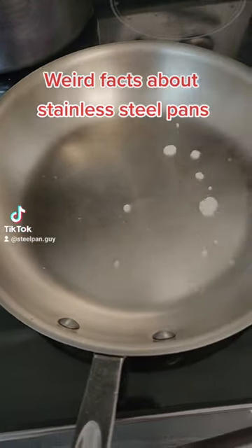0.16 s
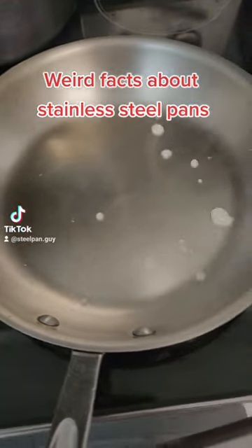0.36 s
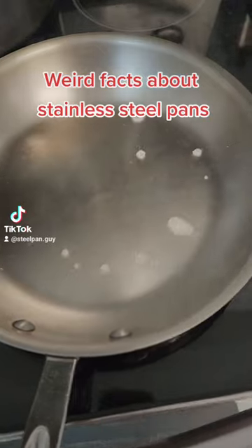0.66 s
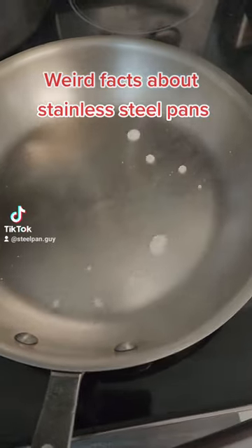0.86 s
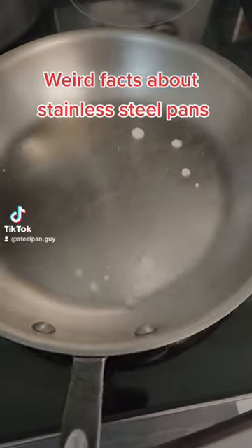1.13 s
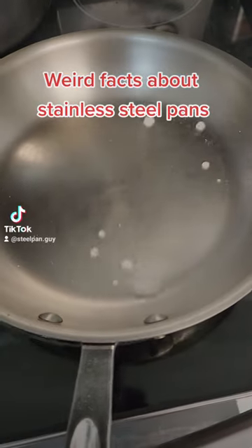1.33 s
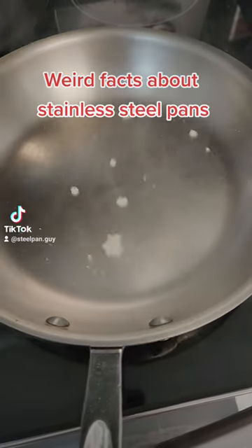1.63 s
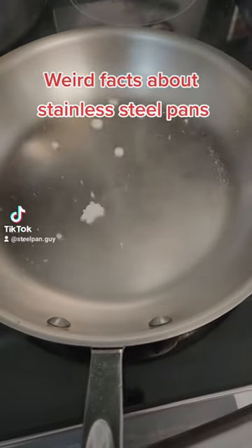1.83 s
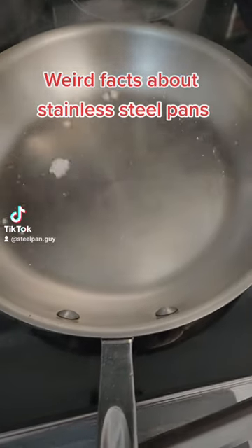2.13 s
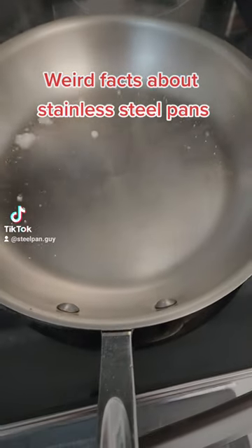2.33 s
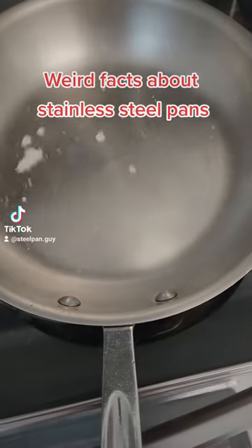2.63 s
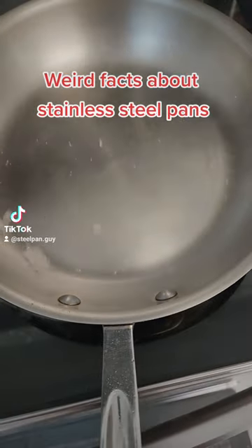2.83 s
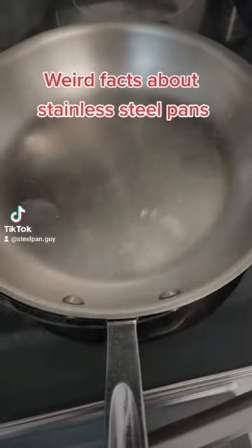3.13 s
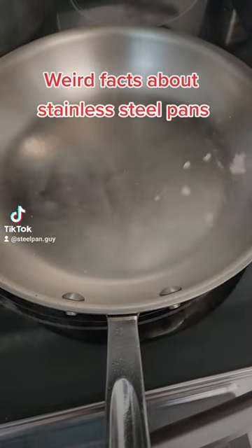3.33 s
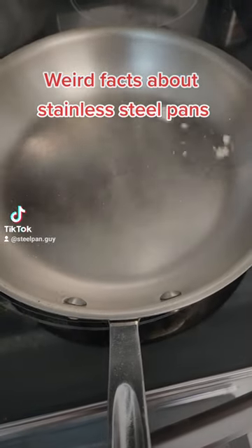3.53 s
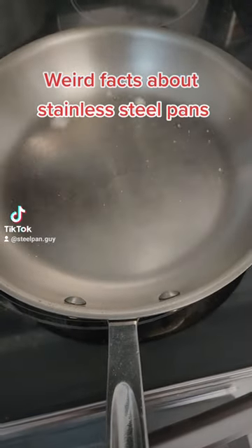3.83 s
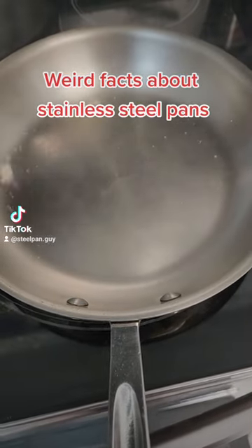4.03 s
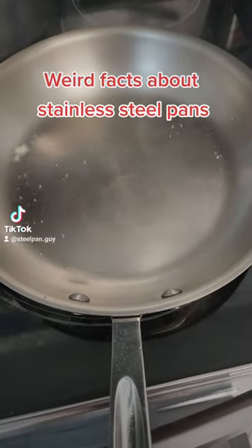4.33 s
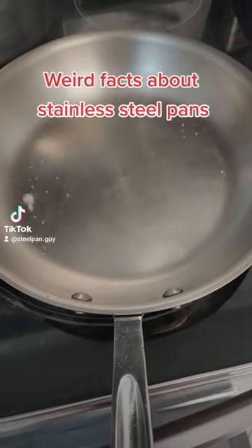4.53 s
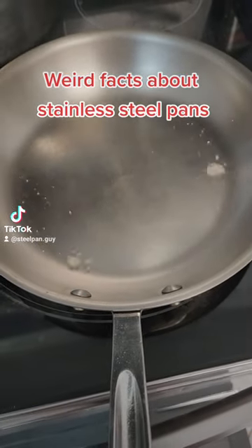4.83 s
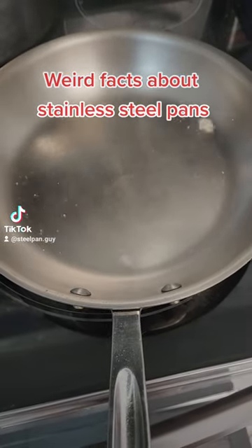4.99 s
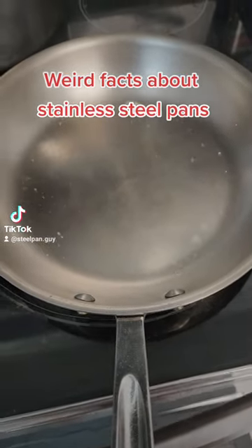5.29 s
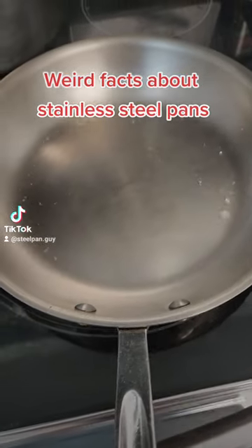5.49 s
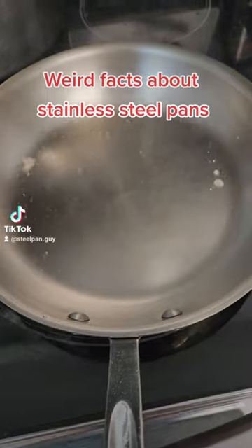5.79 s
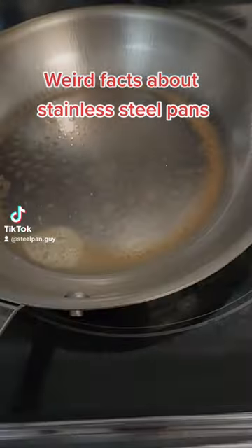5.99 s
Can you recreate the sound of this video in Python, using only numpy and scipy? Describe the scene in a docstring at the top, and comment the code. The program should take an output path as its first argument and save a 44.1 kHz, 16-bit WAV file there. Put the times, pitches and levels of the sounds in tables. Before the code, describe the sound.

A close stereo capture in a small kitchen with a faint low room rumble. From 0 s, water drops sizzle in a hot steel pan: bright continuous hiss, dense fine crackle, little ticks and a coarser sputter underneath, coloured by thin metallic resonances. At about 0.3 s the pan lands hard on the hob, a loud, quick double clack with short echo and low boom. Very soft bumps follow near 1.0 and 1.95 s while the sizzle gently swells and ebbs. Around 2.75-3.05 s it flares strongly, with sharp spits and low boiling flutter; a muffled, weighty thud lands at 3.08 s. Another faint bump comes near 3.7 s. The sizzle gradually dries, thinner and quieter, with smaller flares near 4.35, 4.7, 5.05 and 5.5 s and isolated pops. At 5.95 s everything cuts out briefly; at 6.02 s a dull knock and short clatter end it, without sizzle.

```python
"""A small kitchen, a phone close to a hot steel pan that is swirled while water drops skate and boil on it.
The sizzle is shaped stereo noise: steam, random bursts, ticks and pan resonances. It flares as water
spreads out, once strongly, and slowly dries. The pan knocks on the hob, hard at first, then in a few
soft bumps, as damped sines and cracks with an echo; after the heavy landings the room booms.
Near the end the sound cuts out briefly; the room returns with one more knock and a short clatter."""
import sys
import numpy as np
from scipy import signal
from scipy.fft import rfft, irfft, next_fast_len
from scipy.io import wavfile
from scipy.ndimage import uniform_filter1d, minimum_filter1d, map_coordinates

SR = 44100
rng = np.random.default_rng(int(sys.argv[2]) if len(sys.argv) > 2 else 0)


def generate_wav(sig):
    """Save sig (samples, or channels by samples) to the path in sys.argv[1] as 16-bit PCM at SR."""
    pcm = np.round(np.clip(np.atleast_2d(sig).T, -1, 1) * 32767).astype(np.int16)
    wavfile.write(sys.argv[1], SR, pcm)


N = 271215

TOP_HZ = 15800  # band limit of the phone
FIZZ_DB = -24.5  # level of the fine fizz before drying and flares


def amp(db):
    """Decibels to gain."""
    return 10 ** (np.asarray(db) / 20)


def unit(x):
    """x at rms 1."""
    return x / np.sqrt(np.mean(x ** 2) + 1e-20)


def along(points, hz):
    """The (Hz, value) points read on a log frequency axis."""
    f, v = np.transpose(points)
    return np.interp(np.log(hz + 1), np.log(f + 1), v)


def wobble(rate):
    """A smooth random curve with rate knots a second."""
    knots = rng.standard_normal(int(N * rate / SR) + 4)
    return map_coordinates(knots, [np.arange(N) * rate / SR])


def filtered(x, response):
    """x with its spectrum multiplied by a response of frequency."""
    n = x.shape[-1]
    m = next_fast_len(n + SR // 4)
    return irfft(rfft(x, m) * response(np.fft.rfftfreq(m, 1 / SR)), m)[..., :n]


def add(track, s, sound):
    """Mix a sound into a track from time s on."""
    part = track[..., round(s * SR):][..., :sound.shape[-1]]
    part += sound[..., :part.shape[-1]]


def port_noise(n):
    """White noise at two microphone ports: alike in the bass, unrelated in the treble."""
    # likeness of the two ports: frequency_hz, correlation (0-1)
    likeness = [(200, 0.99), (450, 0.83), (1000, 0), (2600, 0.34), (4000, 0), (7000, 0)]

    def mid_and_side(hz):
        turn = np.arccos(np.clip(along(likeness, hz), 0, 1)) / 2
        return np.array([np.cos(turn), np.sin(turn)])

    mid, side = filtered(rng.standard_normal((2, n)), mid_and_side)
    return np.array([mid + side, mid - side])


def to_ports(hz, lead_s=0.0001683):
    """Sound from the pan reaches the left port a little before the right."""
    return np.exp(2j * np.pi * hz * lead_s * np.array([[.5], [-.5]]))


def room_tone():
    """A faint steady rumble in the kitchen with a low hum in it."""
    # low murmur of the room, shape only: frequency_hz, density_db (per Hz)
    murmur = [(20, 2.5), (48, -0.5), (62, -5.5), (78, 2), (98, -7.5), (122, -2.5), (170, -9), (350, -5),
              (900, -32.5), (3000, -63)]
    rumble_db, hum_db, hum_hz = -52, -63, 53.4
    rumble = unit(filtered(port_noise(N), lambda hz: amp(along(murmur, hz))))
    drift = 0.97 * wobble(7.2)  # phase, rad
    hum = unit(np.sin(2 * np.pi * hum_hz * np.arange(N) / SR + drift))
    return amp(rumble_db) * rumble + amp(hum_db) * hum


def echo():
    """A diffuse stereo room tail of energy 1 in which the treble dies first."""
    # decay of the kitchen: frequency_hz, t60_s
    decay = [(100, 0.43), (500, 0.38), (1200, 0.36), (2500, 0.35), (10000, 0.07)]
    hz, t, z = signal.stft(port_noise(SR // 2), SR, nperseg=256)
    fade = amp(-60 * t / along(decay, hz)[:, None])
    tail = signal.istft(z * fade, SR, nperseg=256)[1]
    return unit(tail) / np.sqrt(tail.shape[-1])


def ring(modes, t):
    """Sum of damped sines of alternating sign, one for each (Hz, dB, t60 s)."""
    return sum((-1) ** k * amp(db - 60 * t / t60) * np.sin(2 * np.pi * hz * t)
               for k, (hz, db, t60) in enumerate(modes))


def contact(cutoff_hz, pitch):
    """One contact rings the hob and cracks; a soft contact lets only the low part sound; the kitchen echoes."""
    # what the hob rings with: frequency_hz, level_db (relative), t60_s
    hob_modes = [(129.7, 1.5, 0.055), (202, -3.5, 0.069), (252, -6.5, 0.045), (382, 0, 0.044),
                 (426, -1.5, 0.072), (481, -0.5, 0.058), (586, -3, 0.05), (637, -0.5, 0.073),
                 (697, -5, 0.12), (822, -2, 0.075), (1023, -8, 0.076), (1205, 5.5, 0.024), (1326, -5, 0.04),
                 (1457, -14, 0.074)]
    crack_db, crack_t60_s = 1.0, 0.064
    echo_db, echo_from_hz = -6.0, 240
    t = np.arange(SR) / SR
    # steel on glass also cracks briefly
    crack_band = signal.butter(1, [480, 1900], "band", fs=SR)
    crack = unit(signal.lfilter(*crack_band, port_noise(SR))) * amp(crack_db - 60 * t / crack_t60_s)
    softness = signal.butter(3, cutoff_hz, fs=SR)
    blow = signal.lfilter(*softness, ring(hob_modes, pitch * t) + crack)
    diffuse = signal.lfilter(*signal.butter(2, echo_from_hz, "high", fs=SR), echo())
    tail = signal.fftconvolve(blow, diffuse, axes=1)[:, :SR] * amp(echo_db)
    return (blow + tail) / np.abs(blow).max()


def room_boom():
    """The whole hob top gives way: a low push of air and its suck back set off the room's standing waves."""
    # standing waves of the kitchen: frequency_hz, level_db (relative), t60_s
    standing_modes = [(61.4, -16, 1), (70.2, -5, 0.91), (83.8, 6, 0.68), (130.5, -4, 0.76),
                      (236.4, 5.5, 0.31), (317, 5.5, 0.3), (357, 6, 0.32)]
    push_db, push_s = 9, 0.0012
    standing_db, standing_top_hz = -4.5, 260
    t = np.arange(SR) / SR
    u = t / push_s
    push = u * (2 - u) * np.exp(-u)
    standing = signal.lfilter(*signal.butter(2, standing_top_hz, fs=SR), ring(standing_modes, t))
    return amp(push_db) * push / push.max() + amp(standing_db) * standing


def rattle():
    """Shaped noise that dies away: the steel rattles on after a heavy landing."""
    # colour of the rattle, shape only: frequency_hz, density_db (per Hz)
    rattle_colour = [(80, 9), (250, 1), (450, 2), (750, 4.5), (1100, 1), (1800, 6), (3500, 0.5), (7000, -4),
                     (15000, -11.5)]
    t60_s = 0.47
    noise = unit(filtered(port_noise(SR), lambda hz: amp(along(rattle_colour, hz))))
    return noise * amp(-60 * np.arange(SR) / SR / t60_s)


def knocks():
    """The pan lands on the hob and rocks: ringing contacts, and a boom and rattle on heavy landings."""
    # one row per contact: start_s, level_db (blow before its echo), cutoff_hz, pitch_factor (of the spot struck)
    contacts = [(0.2877, -2.5, 900, 0.99), (0.2917, -3, 2870, 0.98), (0.2985, -7, 300, 0.97),
                (0.3398, -18.5, 200, 1.03), (0.988, -28, 150, 1.23), (1.006, -33, 140, 1.1),
                (1.018, -34, 130, 1.3), (1.125, -41, 80, 0.54), (1.948, -32.5, 140, 1.26),
                (1.967, -34, 150, 1.2), (1.9806, -33, 150, 1.44), (2.075, -44, 110, 1),
                (3.0794, -13.5, 164, 1.01), (3.0876, -17, 121, 1.11), (3.1445, -25, 70, 0.71),
                (3.667, -39, 120, 1.26), (3.692, -34, 140, 1.2), (6.025, -16.5, 187, 1.26)]
    # heavy landings: start_s, boom_db (relative), rattle_db (at its start)
    landings = [(0.29, -25.5, -44), (3.081, -29, -43), (6.025, -28.5, -25)]
    balance_db, shade_hz, lead_s = -2, 230, 0.00018
    track = np.zeros((2, N))
    for s, db, cutoff_hz, pitch in contacts:
        add(track, s, amp(db) * contact(cutoff_hz, pitch))
    boom = room_boom()
    for s, boom_db, rattle_db in landings:
        add(track, s, amp(boom_db) * boom)
        add(track, s, amp(rattle_db) * rattle())

    def placing(hz):
        # long waves bend around the phone and reach both ports equally
        shade_db = balance_db * hz ** 2 / (hz ** 2 + shade_hz ** 2)
        return to_ports(hz, lead_s) * amp(np.array([[.5], [-.5]]) * shade_db)

    return filtered(track, placing)


def boil_rumble():
    """Spreading water boils hard enough to shake the pan's floor: swells of low noise."""
    # swells: peak_s, half_length_s, level_db
    swells = [(2.891, 0.034, -45), (3.386, 0.18, -53), (4.355, 0.049, -47), (4.688, 0.065, -54)]
    t = np.arange(N) / SR
    low_band = signal.butter(2, [65, 230], "band", fs=SR)
    flutter = unit(signal.lfilter(*low_band, port_noise(N)))
    return flutter * sum(amp(db) * np.exp(-((t - s) / half) ** 2) for s, half, db in swells)


def boil_levels():
    """Levels (dB) of fizz and sputter: both ebb and move with every flare, the sputter a moment later."""
    # water runs onto hotter steel: peak_s, half_length_s, fizz_lift_db, sputter_lift_db (negative dips)
    flares = [(0.06, 0.14, 1.4, 4.5), (0.496, 0.064, 1.3, -3), (1.142, 0.076, 1.5, 3.5),
              (1.494, 0.14, 1.3, 2), (1.925, 0.21, 1.3, 3), (2.12, 0.029, 1.5, -2.5),
              (2.743, 0.077, -0.5, 3), (2.931, 0.14, 5, 3.5), (2.958, 0.056, 3.5, 7.5),
              (3.05, 0.021, -1, 6), (3.345, 0.086, 2.5, 1), (3.49, .035, 0, 0), (3.66, 0.1, 3, 1.6),
              (3.84, 0.065, -1, 0), (4.357, 0.06, 2.5, 2), (4.677, 0.049, 1.5, 1.5),
              (5.052, 0.026, 3.5, -1), (5.47, 0.14, 1.8, 0), (5.86, 0.079, 1.5, 0.5)]
    sputter_start_db, sputter_lag_s = -20, 0.0061
    drying_from_s, drying_db_per_s, breakup_db_per_s = 3.26, 1, 1.19
    t = np.arange(N) / SR
    # the fine fizz holds its level until the water starts to run out
    fizz_db = FIZZ_DB - drying_db_per_s * np.maximum(t - drying_from_s, 0)
    # the coarse sputter fades from the start, as the big drops break up
    sputter_db = sputter_start_db - breakup_db_per_s * t
    for s, half, fizz_lift_db, sputter_lift_db in flares:
        fizz_db = fizz_db + fizz_lift_db * np.exp(-((t - s) / half) ** 2)
        sputter_db = sputter_db + sputter_lift_db * np.exp(-((t - s - sputter_lag_s) / half) ** 2)
    return fizz_db, sputter_db


def bubbles(rate, spread_db, life):
    """Power (mean 1) of steam bubbles bursting at random, each a sudden puff that decays by 1/e in life s."""
    births = rng.random(N) < rate / SR
    strength_db = spread_db * np.minimum(rng.standard_normal(N), 2.8)
    power = births * amp(strength_db) ** 2
    power = signal.lfilter([1], [1, -np.exp(-1 / (life * SR))], power)
    return power / power.mean()


def add_spits(boiling, fizz_db):
    """Single drops burst: each adds the power of a snap and then fine spray, whatever the fizz level."""
    # drops that burst: start_s, level_db (relative)
    spits = [(2.317, -9), (2.484, -10), (2.9, 1), (2.952, -8), (2.9655, -13), (2.982, -16), (2.9985, -17),
             (3.0275, -7), (3.053, -7.5), (3.059, -1), (3.0725, -7), (3.8402, -6.5), (4.0258, -6),
             (4.099, -13), (4.2, -13), (4.5117, -10), (4.7412, -16), (4.907, -8), (5.046, -12),
             (5.061, -10), (5.123, -13), (5.2217, -11), (5.409, -20), (5.5104, -6.5)]
    trim_db, snap_t60_s = -6.5, 0.006
    spray_db, spray_t60_s = -10, 0.056
    t = np.arange(SR // 20) / SR
    snap = amp(-60 * t / snap_t60_s) ** 2
    spray = amp(spray_db - 60 * t / spray_t60_s) ** 2
    for s, db in spits:
        add(boiling, s, amp(db + trim_db - fizz_db[round(s * SR)]) ** 2 * (snap + spray))


def droplets():
    """Flung droplets land and snap, each a damped sine of its own pitch and strength; rms 1."""
    rate, centre_hz, spread_octaves = 380, 5200, 0.62  # rate per second
    cycles, spread_db = 1.67, 1.5  # a tick falls to 1/e^2 in this many cycles
    draws = np.clip(rng.standard_normal((int(rate * N / SR), 4)), -2.2, 2.2)
    size, tone, left_phase, right_phase = draws.T
    starts = rng.integers(0, N, len(size))
    hz = np.minimum(centre_hz * 2 ** (spread_octaves * tone), TOP_HZ)
    k = np.arange(SR // 200)
    turns = hz[:, None] * k / SR
    envelope = amp(spread_db * size)[:, None] * np.exp(-2 * turns / cycles)
    places = (starts[:, None] + k).ravel()
    ports = []
    for phase in (left_phase, right_phase):
        ticks = envelope * np.sin(2 * np.pi * turns + phase[:, None])
        ports.append(np.bincount(places, ticks.ravel(), N)[:N])
    return unit(np.array(ports))


def bowl(hz):
    """The way from the pan's floor to the ports, coloured by the bowl."""
    # the sizzle at each port, shape only: frequency_hz, density_db (per Hz)
    left_colour = [(200, -21), (480, -19), (850, -12), (1150, -9.5), (1500, -12.5), (1850, -5),
                   (2150, -7.5), (3000, -5), (4800, -3), (5400, -1.1), (6700, -2), (7400, -0.5), (8600, -2),
                   (11600, 0.5), (15500, 2.5)]
    # the same columns for the right port
    right_colour = [(200, -21.5), (480, -17.5), (880, -14.5), (1150, -19.5), (1430, -13.5), (1750, -12),
                    (2250, -3), (3600, -6.5), (5500, -4.5), (6500, -10.5), (7400, -7), (8500, -5.5),
                    (10300, -2.5), (15500, -4)]
    colour_db = np.array([along(left_colour, hz), along(right_colour, hz)])
    return unit(amp(colour_db)) * to_ports(hz)


def patchy(x, depth_db):
    """Slow random patches of gain over frequency and time, as the drops skate around the bowl."""
    z = signal.stft(x, nperseg=512)[2]
    field = uniform_filter1d(rng.standard_normal(z.shape), size=3, axis=1)
    field = uniform_filter1d(field, size=12, axis=2)
    return signal.istft(z * amp(depth_db * unit(field)), nperseg=512)[1][:, :N]


def steel(x, flare_db):
    """The bursts ring the pan; each resonance wavers as drops cross its nodes, and shifts with the flares."""
    # narrow resonances: frequency_hz, width_hz, lift_db, flare_follow (further dB per dB of flare)
    pan_modes = [(367, 41, 8, -0.2), (573, 29, 7.5, -0.2), (714, 53, 6, 0.3), (845, 34, 5.5, 0.47),
                 (1305, 38, 8, -0.3), (1420, 60, 7.5, 0.53), (1640, 44, 1.5, -0.6), (2120, 115, 4.8, 0.21),
                 (2280, 120, -0.95, 0.06), (4080, 39, 3, 0.8), (7330, 300, 2.5, 0.07),
                 (12000, 280, 1.5, 0.45), (12440, 300, -1, -0.1), (14700, 860, 1, 0)]
    swing_db, swings_per_s = 1.22, 5
    out = x
    for hz, width_hz, lift_db, flare_follow in pan_modes:
        ringing = signal.lfilter(*signal.iirpeak(hz, hz / width_hz, fs=SR), x)
        gain_db = lift_db + flare_follow * flare_db + swing_db * wobble(swings_per_s)
        out = out + ringing * (amp(gain_db) - 1)
    return out


def sizzle():
    """Thousands of tiny bursts a second, crackles and sharp pops over a hiss of steam; some whole drops spit."""
    steam, crackle, fine = 0.7, 0.14, 0.16  # shares of power
    pop, pop_growth_per_s = 0.022, 0.012
    droplet_db, droplet_follow = -10, 0.1
    mist_hz, mist_swing_db, split_hz = 11000, 0.5, 2500
    wander_db, wander_per_s = 0.6, 2.7
    fizz_db, sputter_db = boil_levels()
    flare_db = fizz_db - FIZZ_DB
    boiling = steam + crackle * bubbles(rate=260, spread_db=0.5, life=0.007)
    boiling = boiling + fine * bubbles(rate=3400, spread_db=0.0, life=0.0008)
    # single pops stand out more as the pan dries
    pop_share = pop + pop_growth_per_s * np.arange(N) / SR
    boiling = boiling + pop_share * bubbles(rate=79, spread_db=0.5, life=0.0015)
    add_spits(boiling, fizz_db)
    # flares fling droplets harder
    ticks = droplets() * amp(droplet_db + droplet_follow * flare_db)
    bursts = np.sqrt(boiling) * port_noise(N) + ticks
    sound = patchy(filtered(bursts, bowl), depth_db=2.5)
    # the finest mist comes and goes by itself
    mist = filtered(sound, lambda hz: 1 - 1 / (1 + (hz / mist_hz) ** 8))
    sound = sound + mist * (amp(mist_swing_db * wobble(9)) - 1)
    sound = steel(sound, flare_db)
    # big drops carry the low end, which thins out as they break up
    low = filtered(sound, lambda hz: 1 / (1 + (hz / split_hz) ** 4))
    sputter = low * amp(sputter_db + 0.41 * wobble(16))
    fizz = (sound - low) * amp(fizz_db)
    # the drops wander from side to side as the pan is swirled
    balance_db = wander_db * wobble(wander_per_s)
    flicker_db = 0.28 * wobble(45)
    return (sputter + fizz) * amp(flicker_db + np.array([[.5], [-.5]]) * balance_db)


def scene():
    """Sizzle and room tone drop out at the gap; only the last knock and the room follow it."""
    # silence near the end: start_s, end_s
    gap_s = (5.953, 6.024)
    fade_s = 0.01
    t = np.arange(N) / SR
    before = np.clip((gap_s[0] - t) / fade_s + 1, 0, 1)
    room = room_tone() * np.maximum(before, t > gap_s[1])
    return room + knocks() + boil_rumble() + sizzle() * before


def record(dry):
    """The phone drops the deepest bass, limits the peaks and keeps nothing above its band limit."""
    low_cut_hz, ceiling = 36.5, .95  # ceiling as a share of full scale
    dry = signal.lfilter(*signal.butter(2, low_cut_hz, "high", fs=SR), dry)
    needed = np.minimum(1, ceiling / (np.abs(dry).max(axis=0) + 1e-9))
    gain = uniform_filter1d(minimum_filter1d(needed, size=64), size=64)
    return filtered(dry * gain, lambda hz: hz < TOP_HZ)


dry = scene()
out = record(dry)
generate_wav(out)
```